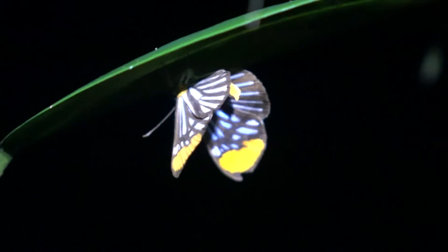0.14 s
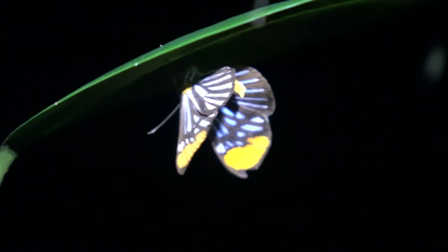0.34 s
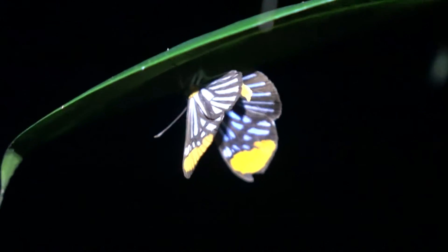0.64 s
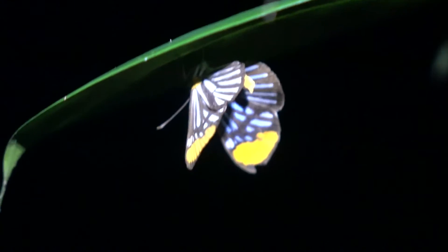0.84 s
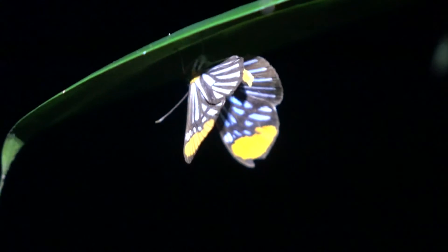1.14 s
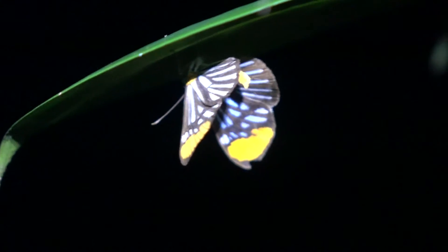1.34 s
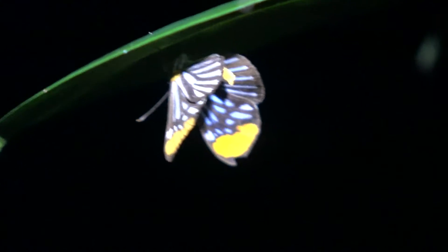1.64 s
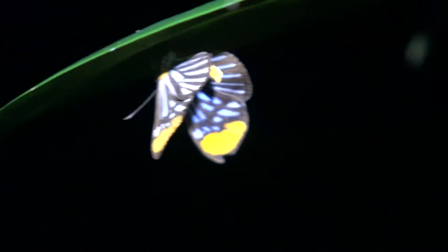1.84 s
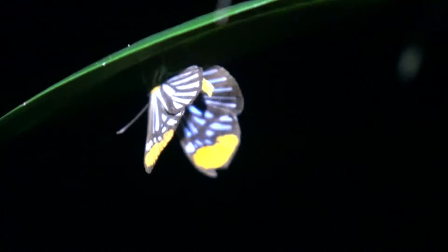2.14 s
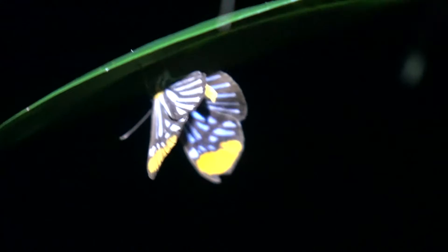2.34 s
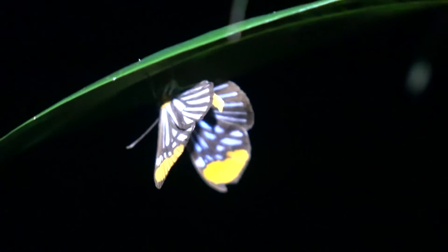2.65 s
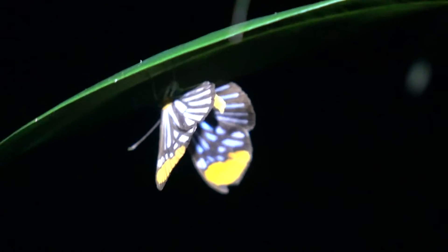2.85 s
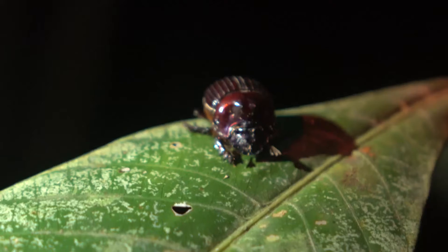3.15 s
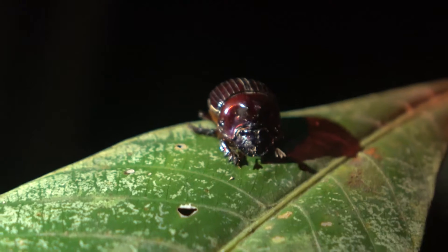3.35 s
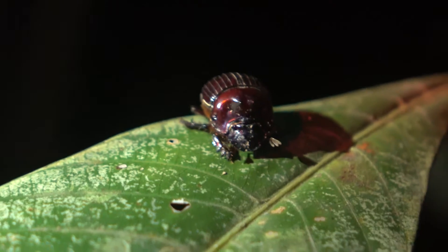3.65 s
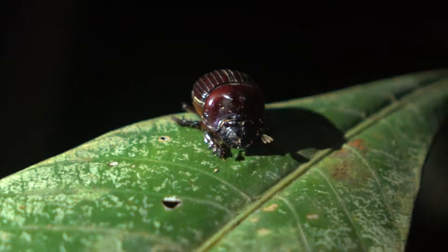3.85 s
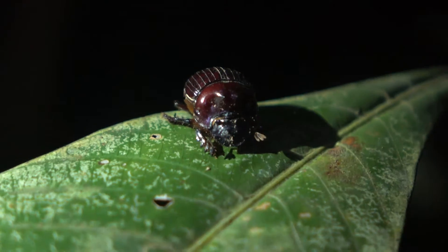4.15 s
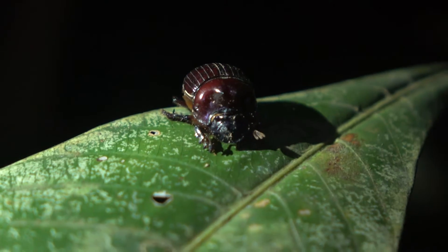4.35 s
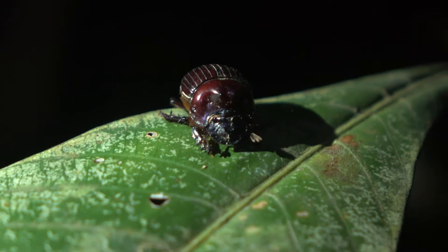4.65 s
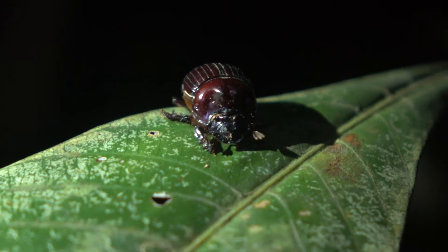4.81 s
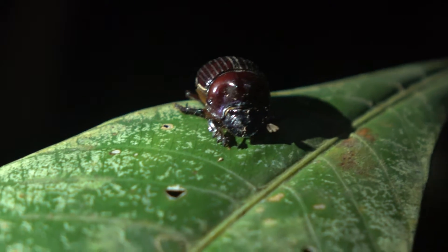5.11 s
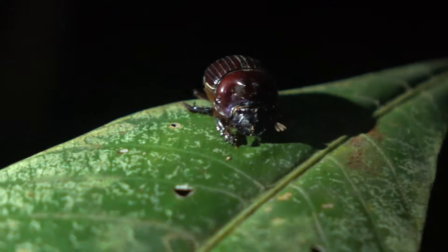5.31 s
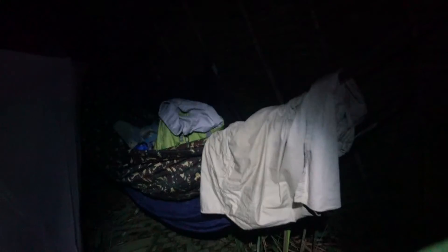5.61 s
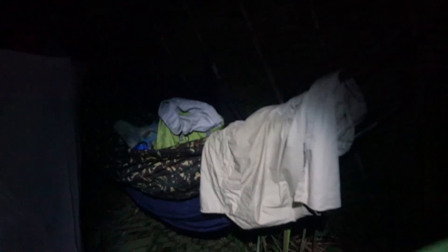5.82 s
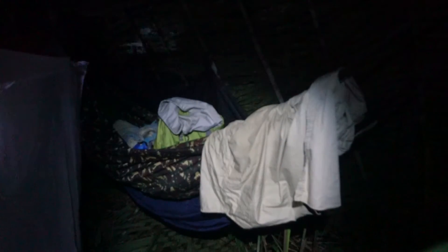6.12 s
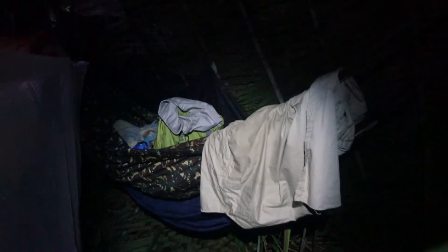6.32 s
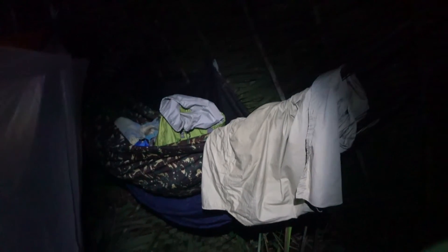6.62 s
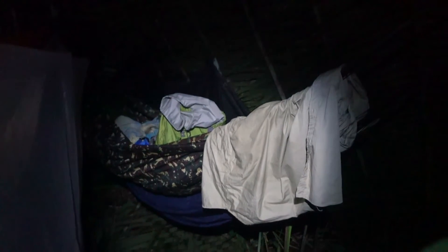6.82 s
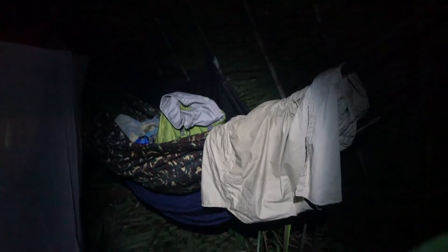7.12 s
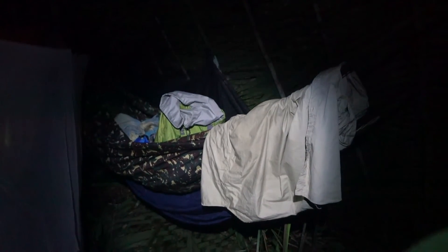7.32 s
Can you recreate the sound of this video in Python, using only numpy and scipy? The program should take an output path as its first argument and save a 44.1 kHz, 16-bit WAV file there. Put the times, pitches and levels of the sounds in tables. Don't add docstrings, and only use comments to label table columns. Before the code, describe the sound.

A steady, bright cricket chorus runs throughout, with even shriller insects above and soft wind rumble below. Near and far tree frogs give short rising chirps, pure peeps and falling trills that echo among trunks. Katydid buzzes return on the left, fast scrapes tick from about two to four seconds, and drips dot leaves and ground, the loudest a sharp snap near 5.8 seconds. Wide stereo, outdoors at night.

```python
import sys
import numpy as np
from scipy import signal
from scipy.fft import rfft, irfft, next_fast_len
from scipy.io import wavfile
from scipy.ndimage import uniform_filter1d, map_coordinates

SR = 44100
rng = np.random.default_rng(int(sys.argv[2]) if len(sys.argv) > 2 else 0)


def persist_wave(psi):
    counts = np.round(np.clip(psi, -1, 1) * 32767).astype(np.int16)
    wavfile.write(sys.argv[1], SR, np.atleast_2d(counts).T)


def magnitude_from_level(level_db):
    exponent = np.asarray(level_db, float) / 20
    return 10 ** exponent


N = 329418

# (time [s], level [dB])
CHORUS_LEVEL = [(0.0, -32), (0.39, -33.5), (1.0, -33.5), (1.27, -32.5), (1.79, -35), (3.62, -33),
                (3.81, -33.5), (4.89, -34), (5.6, -32.5), (7.47, -33)]
# (frequency [Hz], density [dB])
WING_SPECTRUM = [(2180, -50), (3700, -21), (3940, -22), (4310, -9), (4820, -13), (5250, 2.5), (5550, 4.5),
                 (5800, 2.5), (6250, -10), (6940, -14), (7420, -11.5), (8080, -25.5), (9000, -29),
                 (11700, -57), (19800, -120)]
# (frequency [Hz], density [dB])
SHRILL_SPECTRUM = [(5290, -38), (9000, -24), (9510, -26), (10100, 8), (10600, 11.5), (11000, 3.5),
                   (12500, -21), (16200, -50), (22000, -120)]
# (frequency [Hz], level [dB])
NEAR_CRICKETS = [(4480, -51), (4690, -45), (5900, -61), (6233, -53), (6520, -45.5), (6800, -72),
                 (7162, -62), (7450, -61.5), (8530, -62.5)]
# (time [s], level [dB])
BREEZE_LEVEL = [(0.0, -35.5), (1.54, -39), (1.64, -86), (1.66, -30.5), (2.06, -40.5), (2.12, -31),
                (2.33, -38), (3.06, -40.5), (3.18, -32), (4.33, -35.5), (4.35, -28), (4.54, -38),
                (5.64, -36.5), (5.7, -36.5), (7.2, -36.5), (7.3, -32), (7.37, -41), (7.47, -35)]
# (frequency [Hz], density [dB])
RUMBLE_SPECTRUM = [(8.8, -35), (15, 10), (27, -12), (40, -3), (113, -25), (200, -35), (260, -43.5),
                   (440, -120)]
# (frequency [Hz], density [dB])
CANOPY_SPECTRUM = [(60, -23.5), (130, -20), (400, -27), (1290, -35), (2320, -35.5), (3160, -36),
                   (8500, -42.5), (12100, -47.5), (15700, -47.5), (15850, -110)]
# (frequency [Hz], t60 [s])
FOREST_T60 = [(1000, 1), (2500, 0.92), (4500, 1), (10000, 0.35), (20000, 0.015)]
# (time [s], level [dB], left-right [dB])
FAR_CROAKS = [(0.0209, -46, -9), (1.3892, -49, -2), (1.9629, -50, -19), (2.6015, -47, -6), (4.559, -50, 4),
              (5.3248, -45.5, -7)]
# (time [s], level [dB], left-right [dB], pitch [Hz], nearness [dB])
LOW_WHISTLES = [(0.36, -44.5, 2, 3195, 1), (0.4569, -46, 2, 3206, 4.5), (1.664, -51, 8, 3343, -0.5),
                (1.735, -55, -1, 3340, 14.5), (4.022, -50.5, 0.5, 3300, -4), (4.11, -51, 6, 3318, -5),
                (4.21, -54, -3, 3330, -12)]
MID_WHISTLES = [(0.0294, -51.5, 9, 3409, -9), (2.4069, -46.5, 0.5, 3390, -12),
                (2.6404, -36, 12.5, 3430, 1.5), (3.0245, -54, -5, 3450, -11), (3.5533, -57, 5, 3400, -6),
                (5.0414, -51.5, 4.5, 3399, -3), (5.1355, -59, 7, 3440, -3), (5.8526, -32.5, -7, 3446, -7),
                (7.2035, -47, 10.5, 3390, -8)]
HIGH_WHISTLES = [(0.1694, -49, -2, 4300, -2.3), (1.3783, -37.5, 12, 4290, -8), (2.2955, -37, 2, 4470, -2.5),
                 (2.9272, -35, 4, 4370, -5.5), (3.192, -27, 5, 4382, 0.5), (3.2306, -30.5, 11.5, 4320, 3.3),
                 (4.675, -43, 4, 4300, -8), (5.1512, -35, -8.5, 4330, -9), (5.9635, -33, 5, 4470, -12),
                 (6.7805, -47, -4, 4450, -5), (7.006, -28.5, 4, 4334, 5.5), (7.3855, -27, 8.5, 4390, -4)]
TOP_WHISTLES = [(2.13, -31.5, 1.48, 4594, 4.5), (2.529, -32, 2.3, 4580, -5), (3.914, -40, 0.3, 4500, 2),
                (3.9933, -25, 5.4, 4605, -2), (5.238, -30.5, 0.52, 4780, 2), (6.3107, -28, 2.7, 4606, 3.5)]
DEEP_WHISTLES = [
    (4.146, -53, 0.67, 1150, -7),
    (4.7433, -51.5, 6, 1623, 2),
    (6.9084, -49, 2.1, 1606, -1),
]
WHISTLE_LENGTH_S = [0.07, 0.049, 0.029, 0.027, 0.028]
# (time [s], peak [dB], left-right [dB], leaf resonance [Hz], t60 [s])
LEAF_DROPS = [
    (0.0475, -28.5, 0, 2000, 0.015),
    (0.533, -30, 2, 4000, .012),
    (0.8213, -28, -4, 1500, 0.089),
    (1.077, -27.5, -2, 1800, 0.014),
    (2.0748, -25.5, 5, 2190, 0.016),
    (4.9102, -21.5, 14, 2320, 0.074),
    (5.8246, 3.5, 6.5, 4080, 0.009),
    (6.1458, -32, 21, 2000, 0.02),
    (6.3557, -16.5, 10, 5070, 0.014),
    (6.7525, -24, 15, 11000, .008),
]
# (time [s], peak [dB], left-right [dB], leaf resonance [Hz], t60 [s])
DULL_SPLASHES = [
    (3.466, -39, -15, 507, 0.67),
    (3.677, -30, -1, 346, 0.068),
    (3.935, -29.5, 0, 590, 0.6),
    (4.064, -34, -3, 500, 0.13),
    (7.23, -39.5, -19, 450, 0.21),
]
# (time [s], effort [dB], left-right [dB], nearness [dB], octave [dB])
NEAR_CHIRPS = [
    (1.459, -20, 9, 8.5, 8),
    (1.7632, -21, 13.5, -5.5, 18.5),
    (3.3984, -18.5, 15.5, -1.5, 14),
    (6.8832, -21, 6, -1.5, 19),
]
NEAR_CHIRP_HZ = [2072, 2080, 2184, 2045]
# (time [s], effort [dB], left-right [dB], nearness [dB], octave [dB])
DISTANT_CHIRPS = [(0.1294, -30, -2, -21, 16.2), (0.5973, -28.5, -4, -16, 8), (1.037, -28, -13, -22, 11.5),
                  (2.602, -34.5, 11, -26, 12), (2.7294, -31.5, 8, -23, 10), (3.6207, -25, 3, -3.5, 11),
                  (4.2874, -32, 1, -12, 20.3), (4.5085, -34.5, -3.5, -0.5, 9), (5.498, -25.5, 2, -6, 12),
                  (6.1486, -27, 4, -33, 15.7), (7.223, -26, 6.5, -8, 10.7)]
# (delay [s], share [ratio])
TRUNK_ECHOES = [(0, 1), (0.0034, .4), (0.0085, .3), (0.0155, .2)]
# (time [s], level [dB], nearness [dB], rate [notes/s], notes [count])
FALLING_TRILLS = [
    (0.323, -23, -2.5, 6.92, 4),
    (3.521, -19.5, -19, 7.1, 4),
    (3.664, -29.5, -3.5, 17, 8),
    (6.299, -23.5, -14, 15.2, 7),
]
# (time of last stroke [s], level [dB])
KATYDID_BUZZES = [(.459, -53), (1.271, -49), (2.045, -49), (2.85, -53), (3.629, -48), (4.416, -48.5),
                  (5.182, -48), (5.975, -46), (6.758, -47.5), (7.507, -45.5)]
# (time [s], peak [dB], left-right [dB], hollow resonance [Hz], t60 [s])
GROUND_DROPS = [(1.668, -48, -4, 156, 0.076), (1.733, -37.5, 12, 310, 0.041),
                (3.474, -42.5, -27, 295, 0.18), (3.677, -34, 5, 161, 0.05), (3.949, -36, -9, 584, 0.18),
                (3.97, -27.5, -2.5, 434, 0.062), (4.068, -40.5, -8, 182, 0.16),
                (4.084, -26.5, 1, 343, 0.022), (4.905, -31, 3.0, 409, 0.02),
                (7.237, -34.5, -19, 294, 0.052), (7.271, -34.5, -14, 165, 0.1)]
# (time [s], level [dB], left-right [dB])
WING_TICKS = [
    (2.346, -20, 12),
    (2.393, -22, 10),
    (2.45, -23, 12),
    (5.214, -13.5, 4.5),
    (5.515, -23.5, 24),
]

SHRILL_DB, CHORUS_PAN_DB = -49.5, 2.8
RUSTLE_DB, RUSTLE_FOLLOWS, RUSTLE_LAG_S = -43, 0.46, 1
TOAD_START_S, TOAD_EVERY_S, TOAD_LENGTH_S = 0.035, 0.4555, 0.047
TOAD_HZ, TOAD_SAG_HZ_PER_CALL, TOAD_EVEN_DB, TOAD_ODD_DB = 1226, 9, -50.5, -49
LEAF_OCTAVES, LEAF_WIDENS, WIDEST_OCTAVES = 1.45, 0.2, 2.3
FAR_HZ, FAR_TOP_HZ, FAR_THIRD_DB = 2237, 2564, -9
CHIRP_RISE_HZ, RISE_HZ_PER_NEAR_DB = 640, 9
THIRD_DB, THIRD_DB_PER_HZ = -16, 0.0967
TRILL_HZ, TRILL_HZ_PER_RATE, SCOOP_HZ, SCOOP_HZ_PER_RATE = 4308, 16.8, 500, 14
BUZZ_STROKES, BUZZ_PAN_DB, STROKE_S, STROKE_SLOWS_S = 15, 22.5, 0.017, 0.00015
SCRAPE_START_S, SCRAPE_EVERY_S, SCRAPE_DB, SCRAPE_GROWS_DB, SCRAPE_PAN_DB = 1.828, 0.1353, -36.5, 0.35, 12


def unit(x):
    return x / np.sqrt(np.mean(x ** 2) + 1e-20)


def along(points, hz):
    f, v = np.transpose(points)
    return np.interp(np.log(hz + 1), np.log(f + 1), v)


def curve(rows):
    s, value = np.transpose(rows)
    return np.interp(np.arange(N) / SR, s, value)


def wobble(rate_hz):
    knots = rng.standard_normal(int(N * rate_hz / SR) + 4)
    return map_coordinates(knots, [np.arange(N) * rate_hz / SR], order=1)


def coloured(x, spectrum):
    m = next_fast_len(N + 8192)
    gain = magnitude_from_level(along(spectrum, np.fft.rfftfreq(m, 1 / SR)))
    return unit(irfft(rfft(x, m) * gain, m)[..., :N])


def sides(pan_db):
    return magnitude_from_level(np.array([[.5], [-.5]]) * pan_db)


def train(sounds, times_s):
    row = np.zeros(round(times_s[-1] * SR) + max(map(len, sounds)))
    for sound, s in zip(sounds, times_s):
        row[round(s * SR):][:len(sound)] += sound
    return row


def add(out, s, sound, db, pan_db, hz, near_db, lag=4.5, hollow=0):
    t = np.arange(SR // 2) / SR
    tail = rng.standard_normal((2, len(t)))
    tail += hollow * np.cos(2 * np.pi * hz * t + [[0], [1]])
    tail *= (1 + 0.68 * magnitude_from_level(-60 * t / 0.45)) * magnitude_from_level(-60 * t / along(FOREST_T60, hz))
    tail *= 1 - np.exp(-t / 0.0029)
    tail *= magnitude_from_level(-1.0 - near_db) * sides(0.21 * pan_db) / np.linalg.norm(tail[0])
    late = round(lag * pan_db)
    tail[[0, 1], [max(-late, 0), max(late, 0)]] = sides(pan_db)[:, 0]
    wet = magnitude_from_level(db + near_db) * signal.fftconvolve(sound[None], tail, axes=1)
    seg = out[:, round(s * SR):][:, :wet.shape[1]]
    seg += wet[:, :seg.shape[1]]


def note(length_s, hz0, hz1, partials_db, bend=1, edge_s=0.0016, stair_hz=0):
    sac_hz, sac_width_hz = 4760, 540
    t = np.arange(round(length_s * SR)) / SR
    hz = hz0 + (hz1 - hz0) * (t / length_s) ** bend
    hz = hz + stair_hz * np.sin(2 * np.pi * t / 0.01345)
    phase = 2 * np.pi * np.cumsum(hz) / SR
    shape = np.clip(np.minimum(t, (length_s - t) / 2) / edge_s, 0, 1)
    sac = 1 / (1 + ((2 * hz - sac_hz) / sac_width_hz) ** 4)
    voice = 0
    for k, db in enumerate(partials_db):
        voice = voice + magnitude_from_level(db) * (sac if k else 1) * np.sin((k + 1) * phase)
    return shape * voice


def cricket_chorus():
    t, swarm = np.arange(N) / SR, np.zeros((2, N))
    for pitch, rate, side in rng.random((36, 3)):
        pulse_hz, wing_hz = 40 + 160 * rate, 4200 + 3500 * pitch
        strokes = np.clip(0.36 + np.sin(2 * np.pi * pulse_hz * t + 6 * wobble(9)), 0, 1)
        port_phase = [[0], [40 * side]]
        wing = np.sin(2 * np.pi * wing_hz * t + 2.84 * wobble(250) + port_phase)
        swarm += sides(16 * side - 8) * strokes * wing * magnitude_from_level(3.1 * wobble(3))
    far = rng.standard_normal((2, N))
    level = magnitude_from_level(curve(CHORUS_LEVEL) + 3.0 + 0.78 * wobble(13))
    return coloured(0.3 * unit(swarm) + 0.72 * far, WING_SPECTRUM) * level * sides(CHORUS_PAN_DB)


def near_crickets():
    t, out = np.arange(N) / SR, np.zeros((2, N))
    for hz, db in NEAR_CRICKETS:
        level = magnitude_from_level(db + 3.2 * wobble(2.58))
        out += level * np.sin(2 * np.pi * hz * t + 3 * wobble(90) + [[0], [1.7]])
    return out


def shrill_insects():
    t = np.arange(N) / SR
    level = magnitude_from_level(SHRILL_DB + 1.05 * wobble(3.72) + 1.7 * wobble(30))
    beat = 1 + 0.22 * np.sin(2 * np.pi * 50.5 * t + 1.5 * wobble(3.3))
    return level * beat * coloured(rng.standard_normal((2, N)), SHRILL_SPECTRUM) * sides(2.3)


def breeze():
    buffet_db = curve(BREEZE_LEVEL)
    lumps = magnitude_from_level(3.6 * np.array([wobble(27.0), wobble(9)]))
    rumble = unit(lumps * coloured(rng.standard_normal((2, N)), RUMBLE_SPECTRUM))
    buffet = magnitude_from_level(buffet_db + 6.5) * sides(-5.5) * rumble
    slow_db = uniform_filter1d(buffet_db, round(RUSTLE_LAG_S * SR))
    rustle_db = RUSTLE_DB + RUSTLE_FOLLOWS * (slow_db - buffet_db.mean())
    a, b = rng.standard_normal((2, N))
    hiss = coloured(np.array([a + 0.9 * b, a - 1.04 * b]), CANOPY_SPECTRUM)
    return buffet + magnitude_from_level(rustle_db) * hiss * sides(0.48)


def far_croaks():
    out = np.zeros((2, N))
    for s, db, pan, in FAR_CROAKS:
        add(out, s, note(0.048, 3540, 3760, [0]), db + 7.5, pan, 3650, near_db=-17)
    return out


def peeps():
    out = np.zeros((2, N))
    kinds = [LOW_WHISTLES, MID_WHISTLES, HIGH_WHISTLES, TOP_WHISTLES, DEEP_WHISTLES]
    for kind, length_s in zip(kinds, WHISTLE_LENGTH_S):
        for s, db, pan, hz, near in kind:
            whistle = note(length_s, .998 * hz, 1.002 * hz, [0], edge_s=0.006)
            add(out, s - .006, whistle, db + 5.5, pan, hz, near, hollow=.035)
    return out


def toad():
    out = np.zeros((2, N))
    for k in range(5):
        hz = TOAD_HZ - k * TOAD_SAG_HZ_PER_CALL
        call = note(TOAD_LENGTH_S, hz, hz, [0], edge_s=0.0068)
        db = TOAD_ODD_DB if k % 2 else TOAD_EVEN_DB
        add(out, TOAD_START_S + k * TOAD_EVERY_S, call, db, 2.1, hz, near_db=-3.5)
    return out


def leaf_drops():
    out, t = np.zeros((2, N)), np.arange(SR // 8) / SR
    f = np.fft.rfftfreq(2 * len(t), 1 / SR)
    for s, db, pan, hz, t60 in [*LEAF_DROPS, *DULL_SPLASHES]:
        octaves = min(LEAF_OCTAVES * (100 * t60) ** LEAF_WIDENS, WIDEST_OCTAVES)
        blow = 0.33 * rng.standard_normal(len(t)) * magnitude_from_level(-60 * t / t60)
        blow[[0, 40]] += 3.5, 0.9
        damping = 1j * f * hz * octaves
        leaf = (damping / (hz * hz - f * f + damping)) ** 2 / (1 + 1j * f / 11000) ** 2
        snap = irfft(rfft(blow, 2 * len(t)) * leaf)[:len(t)]
        add(out, s, -snap / np.max(abs(snap)), db - 9, pan, 20000, near_db=7.5, lag=0)
    return out


def chirps():
    out = np.zeros((2, N))
    glides = []
    for hz, (_, _, _, near, _) in zip(NEAR_CHIRP_HZ, NEAR_CHIRPS):
        third_db = THIRD_DB + THIRD_DB_PER_HZ * (hz - min(NEAR_CHIRP_HZ))
        glides.append((hz, hz + CHIRP_RISE_HZ + RISE_HZ_PER_NEAR_DB * near, third_db))
    glides += [(FAR_HZ, FAR_TOP_HZ, FAR_THIRD_DB)] * len(DISTANT_CHIRPS)
    for (s, db, pan, near, octave), (hz0, hz1, third) in zip([*NEAR_CHIRPS, *DISTANT_CHIRPS], glides):
        partials_db = [0, octave, third, third - 20, third - 17]
        call = note(.04, hz0, hz1, partials_db, bend=0.8, stair_hz=22)
        call = train([share * call for _, share in TRUNK_ECHOES], [late for late, _ in TRUNK_ECHOES])
        beats = rng.standard_normal(20)
        flutter = magnitude_from_level(2.8 * np.interp(np.arange(len(call)) / SR, np.arange(20) * .0035, beats))
        add(out, s, call * flutter, db - 9.5, pan, 3000, near)
    return out


def trills():
    out = np.zeros((2, N))
    for s, db, near, rate, notes in FALLING_TRILLS:
        hz0 = TRILL_HZ - TRILL_HZ_PER_RATE * rate
        fall_hz = SCOOP_HZ - SCOOP_HZ_PER_RATE * rate
        scoops = []
        for hz in hz0 + 2 * rate * rng.standard_normal(round(notes)):
            scoops.append(magnitude_from_level(rng.normal(0, 1)) * note(0.0544, hz, hz - fall_hz, [0], edge_s=0.012))
        add(out, s, train(scoops, np.arange(len(scoops)) / rate), db, -2.5, hz0, near)
    return out


def katydid_buzz():
    out, k = np.zeros((2, N)), np.arange(BUZZ_STROKES)
    times_s = STROKE_S * k + STROKE_SLOWS_S * k ** 2
    for s, db in KATYDID_BUZZES:
        strokes = []
        for j, hz in enumerate(10650 + 35 * rng.standard_normal(BUZZ_STROKES)):
            swell = magnitude_from_level(-8 * np.exp(-j / 3.0))
            strokes.append(swell * note(.012, hz - 50, hz + 50, [0], edge_s=0.0033))
        burst = train(strokes, times_s + rng.random(BUZZ_STROKES) / 2000)
        add(out, s - times_s[-1] - .005, burst, db + 1.0, BUZZ_PAN_DB, 10600, near_db=3.5)
    return out


def ground_drops():
    out, t = np.zeros((2, N)), np.arange(SR // 8) / SR
    for s, db, pan, hz, t60 in GROUND_DROPS:
        ring = np.sin(2 * np.pi * hz * t) * (1 - np.exp(-t / 0.0011)) * magnitude_from_level(-60 * t / t60)
        puff = uniform_filter1d(rng.standard_normal(len(t)), size=24) * magnitude_from_level(-60 * t / 0.14)
        add(out, s, ring + 0.55 * puff, db, pan, 16000, near_db=4.0, lag=0)
    return out


def katydid_scrape():
    out = np.zeros((2, N))
    for n in range(17):
        pitches_hz = 8000 + 100 * rng.standard_normal(3)
        time_chance, level_chance = rng.standard_normal(2)
        strokes = []
        for j, hz in enumerate(pitches_hz):
            strokes.append(magnitude_from_level(-2.5 * j) * note(0.0059, hz + 50, hz - 50, [0], edge_s=0.0014))
        s = SCRAPE_START_S + n * SCRAPE_EVERY_S + .003 * time_chance
        db = SCRAPE_DB + n * SCRAPE_GROWS_DB + 1.5 * level_chance
        add(out, s, train(strokes, [0, .0095, .02]), db, SCRAPE_PAN_DB, 8000, near_db=-5)
    return out


def wing_ticks():
    out = np.zeros((2, N))
    for s, db, pan in WING_TICKS:
        add(out, s, note(0.011, 5400, 5160, [0], edge_s=0.0049), db, pan, 10600, near_db=-2.0)
    return out


def scene():
    insects = cricket_chorus() + near_crickets() + shrill_insects()
    frogs = far_croaks() + peeps() + toad() + chirps() + trills()
    drops = leaf_drops() + ground_drops()
    wings = katydid_buzz() + katydid_scrape() + wing_ticks()
    return insects + breeze() + frogs + drops + wings


def roll_off(x):
    return signal.sosfilt(signal.butter(12, 15800, fs=SR, output="sos"), x)


def record(dry):
    mix = np.clip(dry, -1, 1)
    return roll_off(mix)


dry = scene()
out = record(dry)
persist_wave(out)
```